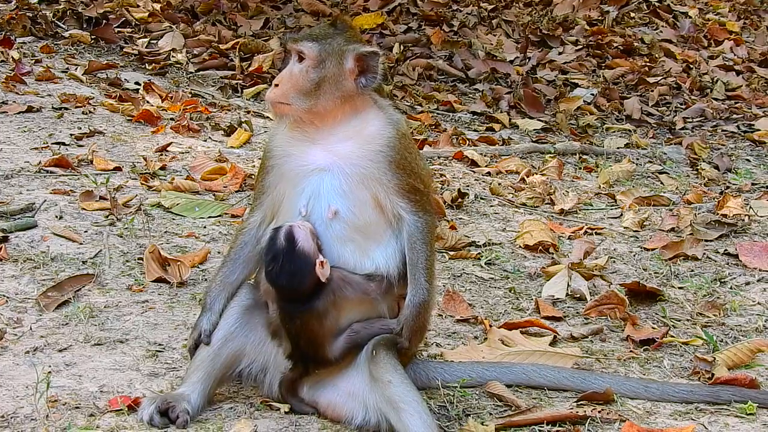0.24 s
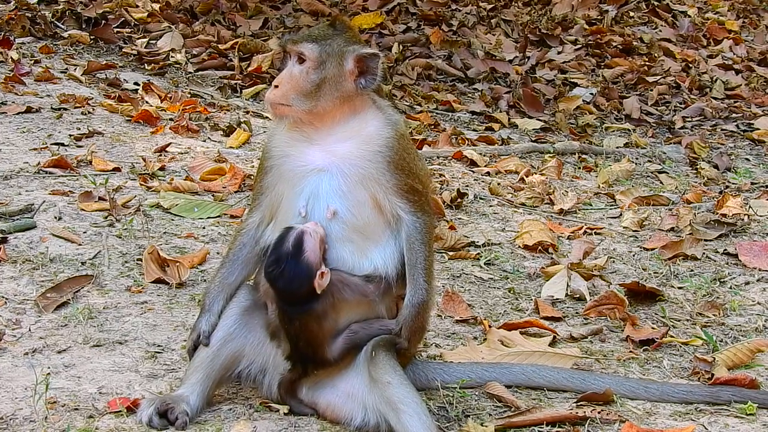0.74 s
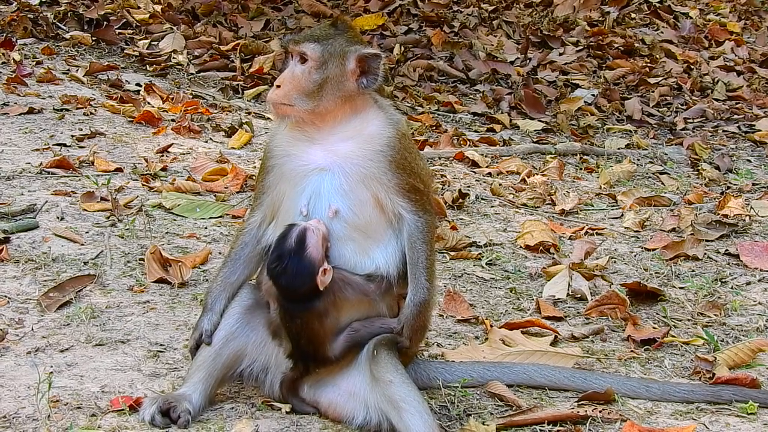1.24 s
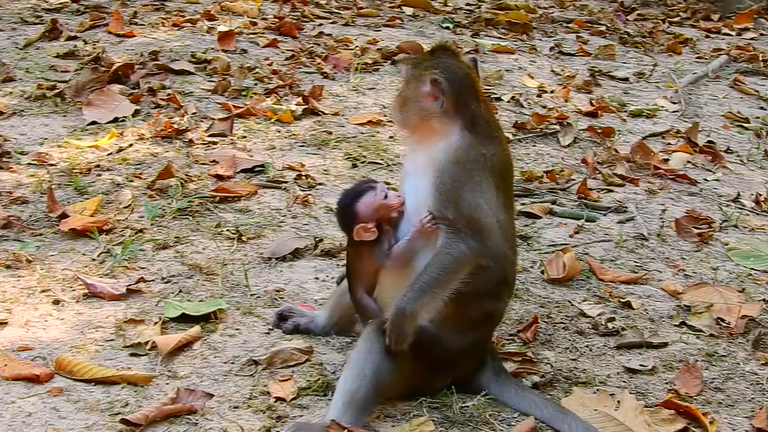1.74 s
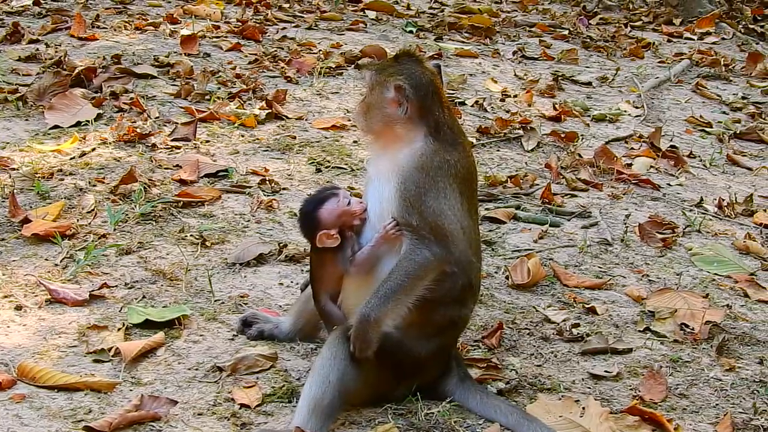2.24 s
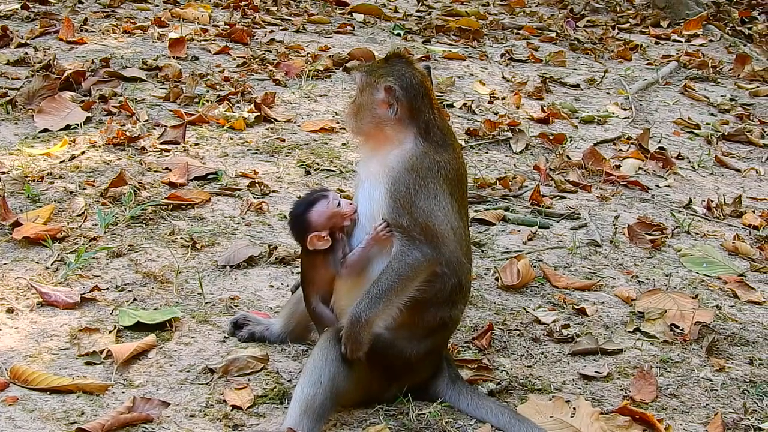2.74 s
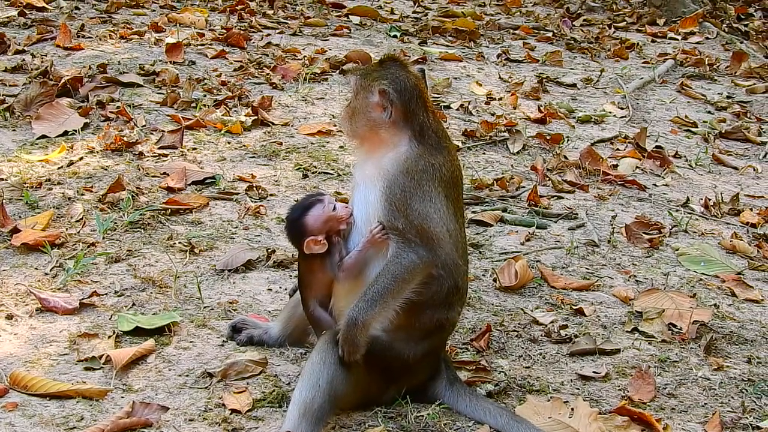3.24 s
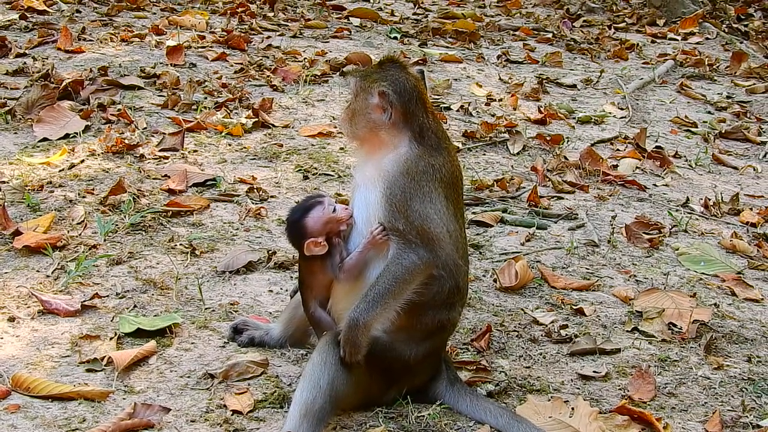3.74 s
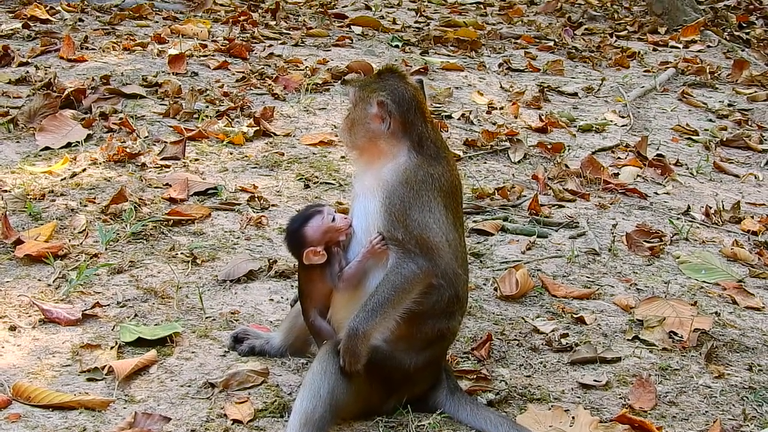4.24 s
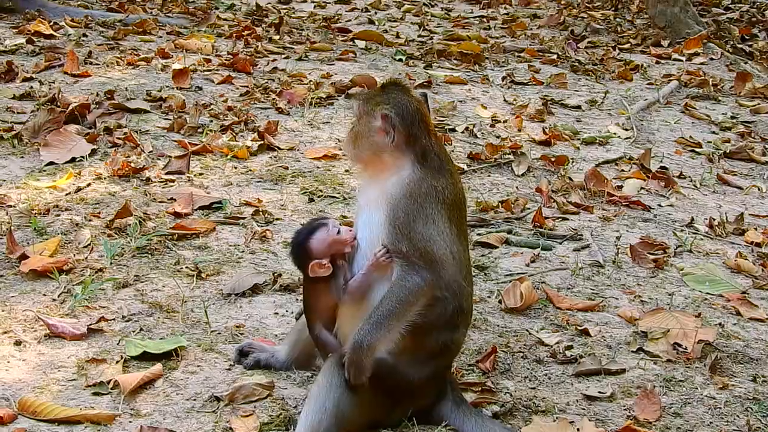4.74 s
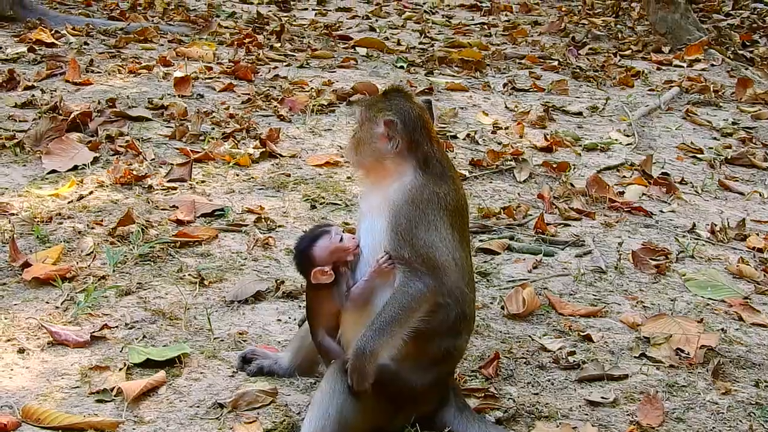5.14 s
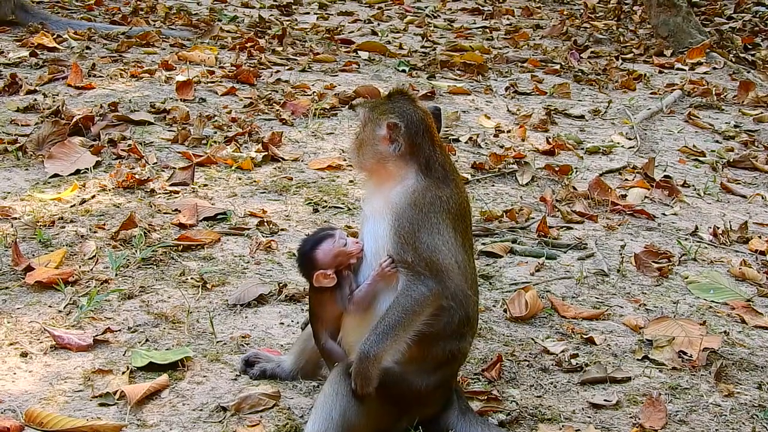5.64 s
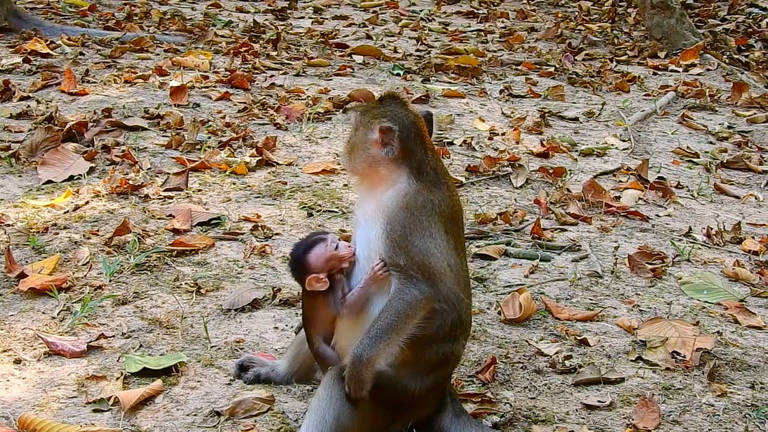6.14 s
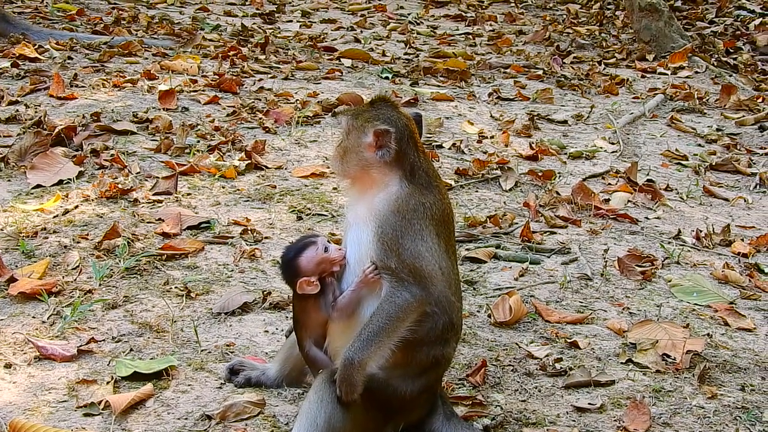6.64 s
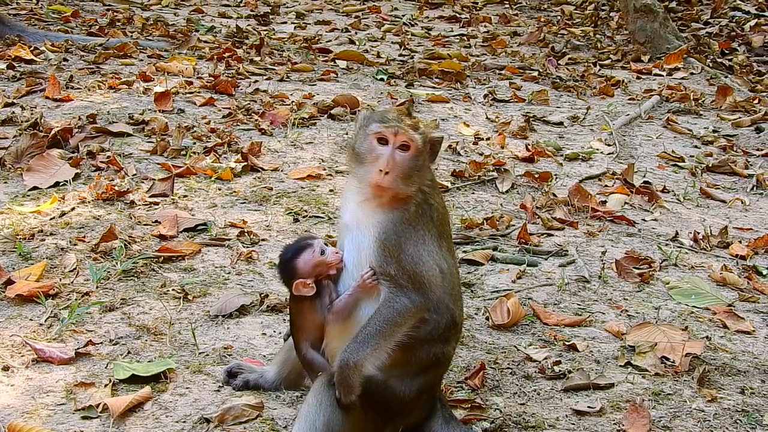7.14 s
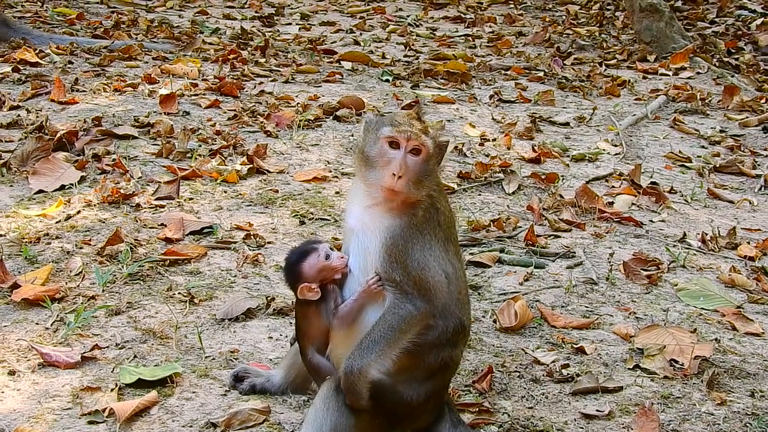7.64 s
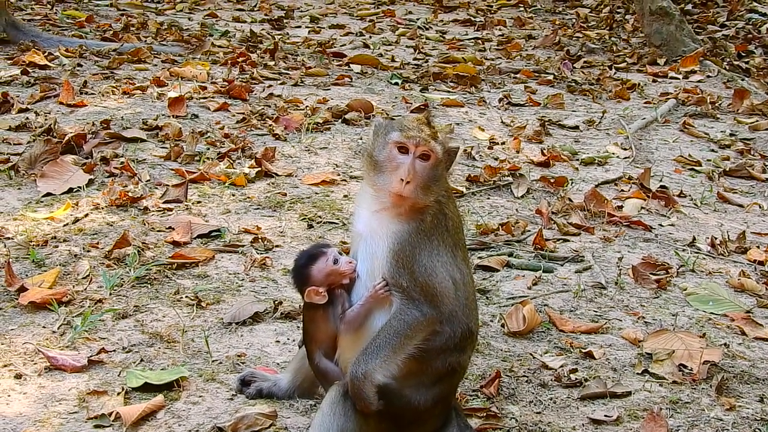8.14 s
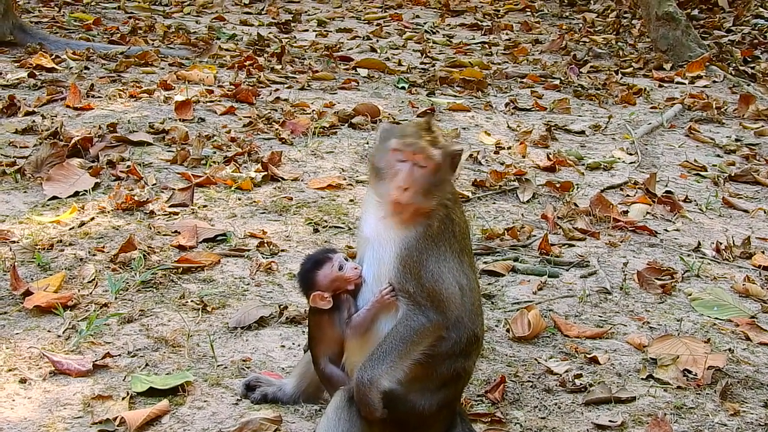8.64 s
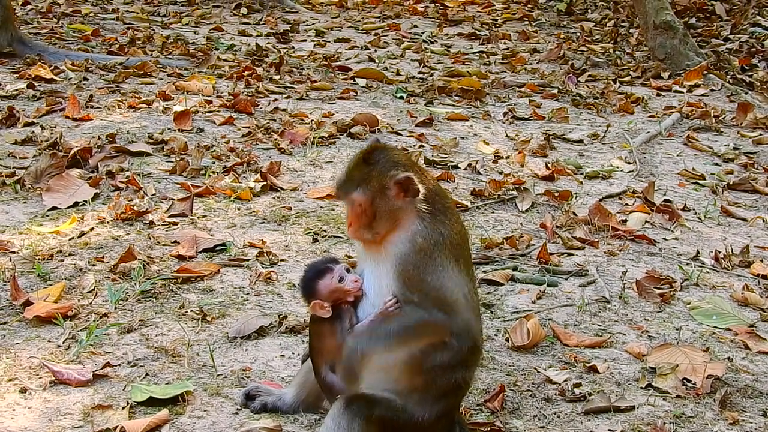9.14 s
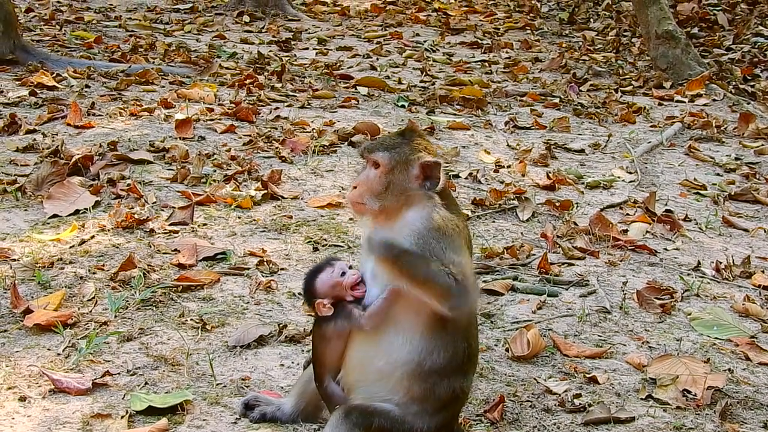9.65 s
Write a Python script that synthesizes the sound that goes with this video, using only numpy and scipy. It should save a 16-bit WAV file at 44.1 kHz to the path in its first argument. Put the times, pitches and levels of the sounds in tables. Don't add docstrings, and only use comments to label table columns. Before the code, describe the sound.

Young monkeys scream far off in echoing woods, then a nearby infant monkey coos in small chirps and ends on a piercing, breaking squeal.

```python
import sys
import numpy as np
from scipy import signal
from scipy.fft import rfft, irfft, next_fast_len
from scipy.io import wavfile
from scipy.ndimage import uniform_filter1d, map_coordinates

SR = 44100
rng = np.random.default_rng(int(sys.argv[2]) if len(sys.argv) > 2 else 0)


def magnitude_from_level(level_db):
    exponent = np.asarray(level_db, float) / 20
    return 10 ** exponent


def put_to_file(sound):
    columns = np.atleast_2d(sound).T
    safe = np.clip(columns, -1, 1)
    whole_steps = np.round(safe * 32767)
    wavfile.write(sys.argv[1], SR, whole_steps.astype(np.int16))


N = 435688

# [t/s, level/dB]
TRAFFIC = [(.8, -39.5), (1.85, -37.5), (2.34, -38.5), (3.3, -37), (4.85, -35), (5.68, -36), (6.43, -35),
           (9.5, -32)]
# [f/Hz, level/dB per Hz]
RUMBLE = [(27, -60), (42, -13), (54, -6), (70, -6), (96, 0.5), (129, 0), (189, -3.5), (205, -6), (258, -12),
          (355, -14), (398, -21.5), (500, -34.5), (650, -45), (1100, -120)]
MURMUR = [(260, -9), (450, -0.5), (649, -0.5), (717, -6), (1290, -6.5), (1550, -7.5), (4000, -12),
          (5200, -50), (8800, -120)]
INSECTS = [(2060, -17.5), (3500, -13), (4150, -5), (4990, -3.5), (5660, -3), (6550, 0), (7680, -11.5),
           (9500, -25), (12400, -56.5), (20900, -120)]
HISS = [(3000, -20), (7000, -10.5), (10000, 0), (15600, -9.5)]
# [f/Hz, coherence/1]
COHERENCE = [(40, 1), (200, 0.99), (400, 0.96), (900, 0.84), (2400, 0.79), (6000, 0.19), (15000, 0.2)]
# [t/s, f/Hz, level/dB]
WHINE = [(4.4, 4680, -69), (5, 4800, -62), (6.5, 5335, -60), (7.6, 5690, -57.5), (8.5, 5870, -60.5),
         (9.88, 6230, -57)]
FIRING_HZ = 23.67
MURMUR_DB, MURMUR_FOLLOWS, INSECT_DB, INSECT_FOLLOWS = -46.5, 0.63, -49, .15

# [t/s, pitch f/Hz, level/dB]
SCREAMS = [
    [(0, 733, -42), (.03, 805, -36), (.06, 839, -32), (.108, 829, -34), (.13, 854, -34), (.17, 858, -33.5),
     (.2, 827, -32.5), (.245, 841, -37)],
    [(.244, 725, -36), (.276, 802, -27.5), (.315, 868, -22), (.35, 867, -26), (.392, 892, -24.5),
     (.407, 930, -18.5), (.436, 909, -26.5), (.478, 874, -25), (.502, 788, -32.5)],
]
# [f/Hz, level/dB]
FIRST_THROAT = [(800, -13.5), (1700, -6.5), (2550, 2.5), (3400, 5.5), (4200, -17), (4600, 1.5), (5100, 6.5),
                (5900, -20.5), (6800, -0.5), (7700, -6.5), (8600, -26.5), (12000, -63.5)]
SECOND_THROAT = [(880, -26), (1800, -15.5), (2700, -9.5), (3400, -7.5), (3750, 3.5), (4500, -16.5),
                 (5400, -8.5), (6400, -4), (7300, -14), (8200, -20), (9500, -35), (13000, -58.5)]
# [f/Hz, level/dB per Hz]
BREATH = [(1500, -43), (2600, -5), (3700, -18.5), (4500, -3.5), (6400, -7), (8500, -13.5), (11000, -54.5)]
HOARSE, HOARSE_PER_DB, FULL_DB = .065, .004, -20
MOUTH_FOLLOWS, MOUTH_PITCH_HZ = 0.78, 904
# [f/Hz, t60/s]
REVERBERATION = [(500, 2.7), (2200, 0.78), (2450, 1.4), (2900, 1.2), (3720, 1.27), (4400, 1.3), (5500, 1.1),
                 (6500, 1.2), (10000, 0.6)]
# [start t/s, end t/s]
GAP = (1.039, 1.537)

# [t/s, level/dB, t60/s]
LEAF_TICKS = [(.872, -45.5, .11), (1.034, -39.5, .03), (1.76, -42, .04), (2.101, -45, .046),
              (3.603, -42, .03), (3.659, -45, .03), (4.818, -42, 0.053), (5.08, -50, .03),
              (5.807, -45.5, 0.085), (6.07, -47, .05), (6.163, -41.5, 0.05), (6.809, -41, 0.032),
              (6.908, -38, .036), (8.37, -47, 0.053), (8.598, -37, 0.031)]
# [centre f/Hz, width/Hz]
LEAF = (6140, 3720)
# [t/s, level/dB, centre f/Hz]
TWIG_SNAPS = [(0.862, -27.5, 1308), (1.027, -34, 750), (4.665, -39, 2010), (4.808, -39, 2320),
              (4.889, -43, 2500), (6.899, -39, 2600), (7.842, -36, 1150), (7.85, -37, 1900),
              (8.574, -39, 1980)]
TWIG_WIDTH, TWIG_T60 = 0.77, 0.036
# [t/s, level/dB, centre f/Hz, width/Hz, t60/s]
BUMPS = [(8.419, -37, 250, 114, 0.37), (8.48, -30.5, 184, 97, 0.24), (3.63, -60, 4300, 900, 1.2),
         (.495, -42.5, 3700, 900, 0.17), (.495, -35, 6000, 1600, 0.11), (9.81, -56, 12800, 900, .6),
         (9.865, -35.5, 6200, 2500, .2), (1.54, -58, 3720, 34, 1.5), (3.8, -58.5, 557, 30, 7.1),
         (9.84, -36, 4570, 500, 0.091), (9.55, -47.5, 5500, 3000, 0.25), (8.83, -58.5, 4250, 890, 1.7),
         (4.898, -44.5, 5600, 3000, 0.099), (1.54, -56.5, 740, 70, 0.84), (7.1, -53.5, 1660, 970, 0.71)]
# [t/s, peak level/dB, f/Hz, time to fall by 30 dB/s]
THUDS = [
    (3.061, -37.5, 644, 0.087),
    (6.326, -28.5, 353, 0.093),
]

# [level/dB, path of (t/s, f/Hz)]
WHISTLES = [
    (-76, [(2.465, 11370), (2.481, 11460), (2.51, 10860)]),
    (-73, [(2.56, 11100), (2.584, 11450), (2.636, 11560), (2.7, 10950), (2.734, 10470), (2.768, 10810), (2.83, 10430), (2.86, 9404)]),
    (-72, [(4.69, 10700), (4.704, 11240), (4.756, 11250), (4.774, 10980), (4.79, 9464)]),
    (-71, [(6.95, 11500), (6.988, 13380), (7.014, 13250), (7.06, 12350), (7.084, 10900), (7.135, 9765)]),
    (-70, [(8.895, 11200), (8.92, 12150), (8.99, 12780), (9.045, 12800), (9.065, 13400)]),
    (-78, [(9.06, 13300), (9.075, 13500), (9.11, 13600), (9.13, 14100), (9.15, 13200), (9.19, 11300), (9.23, 11000), (9.26, 9900)]),
]
FADE_DB = 9
# [t/s, f/Hz, level/dB]
BIRD = [(3.315, 2790, -60), (3.33, 2740, -52), (3.36, 2400, -39.5), (3.39, 2180, -40), (3.45, 2150, -46),
        (3.52, 2170, -42), (3.575, 2170, -44), (3.6, 2210, -71)]
# [start t/s, length/s, from f/Hz, to f/Hz, level/dB]
FAINT_BIRDS = [(3.278, 0.023, 6040, 5800, -46), (3.292, 0.037, 6250, 6550, -45),
               (3.655, 0.06, 2150, 2170, -46), (3.72, .06, 3770, 3850, -56), (3.86, .09, 2160, 2180, -50.5),
               (6.962, .05, 2330, 2260, -56), (7.04, .06, 2230, 2140, -52), (7.099, .15, 1930, 1900, -58)]

# [start t/s, length/s, top pitch f/Hz, level/dB, overtone level/dB]
CHIRPS = [
    (4.303, 0.054, 1206, -26, -27),
    (4.452, 0.073, 1367, -26.5, -21.5),
    (4.669, 0.077, 1456, -50, -26),
    (7.298, 0.066, 1287, -27.5, -22.5),
    (7.461, .066, 1202, -34.5, -17),
    (7.611, .062, 1284, -33, -22),
]
# [t/s, pitch f/Hz, level/dB]
LAST_CHIRP = [(7.804, 1470, -50), (7.808, 1454, -42), (7.822, 1498, -33.5), (7.838, 1532, -36),
              (7.852, 1512, -38.5), (7.866, 1460, -56)]
LAST_OPEN_DB, LAST_OPENS_S = -7, 7.819
# [share of length/1, pitch ratio/1, level/dB]
COO = [(0, .92, -25), (.13, .97, -4.5), (.26, 1.001, -1), (.5, .995, 0.1), (.7, .935, -3.5),
       (.87, 0.876, -8), (1, 0.92, -25)]
# [f/Hz, level/dB]
NEAR_THROAT = [(3300, -2), (3800, -1), (4600, 0), (6200, 2), (7700, -16), (9200, -22), (10800, -29),
               (12500, -36), (15500, -40)]
TURN_S = 6
# [second partial level/dB, late overtone swell/dB, overtones fading with effort/dB per dB]
BOUTS = [
    (-24, 7, 1.21),
    (-14, 8.5, .1),
]

# [t/s, f/Hz, level/dB]
SQUEAL = [
    [(9.542, 6880, -34), (9.551, 8130, -20.5), (9.561, 7820, -20.5), (9.571, 8060, -9.5),
     (9.588, 8490, -13.5), (9.6, 9080, -22), (9.615, 9170, -24), (9.63, 9000, -19), (9.638, 8850, -30)],
    [(9.637, 10200, -30), (9.641, 8910, -14), (9.65, 9250, -14.5), (9.675, 9280, -18), (9.69, 9150, -23.5),
     (9.706, 8830, -23.5), (9.725, 8400, -30.5)],
    [(9.745, 8540, -33.5), (9.755, 9360, -20), (9.769, 10260, -22.5), (9.808, 9030, -24),
     (9.858, 8560, -26), (9.868, 9240, -32), (9.885, 9720, -23)],
]
# [t/s, f/Hz, level/dB]
UNDERTONE = [
    [(9.674, 7060, -45), (9.68, 6980, -17.5), (9.688, 6950, -14.5), (9.698, 6890, -7.5),
     (9.703, 6700, -11.5), (9.711, 6500, -9)],
    [(9.708, 6550, -13.5), (9.718, 6290, -13), (9.723, 5920, -15.5), (9.728, 4960, -21.5)],
    [(9.726, 7270, -18), (9.733, 7000, -17.5), (9.742, 6670, -20), (9.753, 6220, -19)],
]
# [times whistle/1, times second/1, level under the second/dB, swell/dB]
SIDEBANDS = [
    (2, -1, -24, -5),
    (-1, 2, -19, 9.5),
]
# [t/s, level/dB]
RASP = [(9.59, -50), (9.635, -36), (9.68, -49.5), (9.703, -32.5), (9.708, -18), (9.728, -20), (9.75, -19),
        (9.758, -42.5), (9.85, -41)]
# [f/Hz, width/Hz, level/dB]
RASP_MOUTH = [(4800, 1700, 3.5), (6500, 1900, 4.5), (9000, 2600, -1.5), (12050, 2000, -10),
              (14560, 2500, -20)]
# [t/s, peak level/dB]
BREAKS = [(9.7068, -7.5), (9.7098, 0), (9.7143, -8), (9.7163, -7.5), (9.7183, -6.5), (9.7235, -2.5),
          (9.7255, -5), (9.7301, -11.5), (9.7312, -9.5), (9.732, -6.5), (9.7346, -7.5), (9.736, -8),
          (9.738, -2), (9.7418, -3.5), (9.7433, -5.5), (9.7483, -6), (9.7495, -6.5), (9.7518, -11.5)]
# [delay/s, level/dB, absorbed above f/Hz]
GROUND_ECHO = (.021, -15, 8500)


def noise(size):
    return np.random.default_rng(rng.integers(2 ** 31)).standard_normal(size)


def unit(x):
    return x / np.sqrt(np.mean(x ** 2) + 1e-20)


def along(points, hz):
    f, v = np.transpose(points)
    return np.interp(np.log(hz + 1), np.log(f + 1), v)


def span(rows):
    s, *cols = np.transpose(rows)
    start = int(s[0] * SR)
    t = np.arange(start, min(int(s[-1] * SR), N)) / SR
    edge = np.clip(np.minimum(t - s[0], s[-1] - t) / .002, 0, 1)
    return start, edge, [np.interp(t, s, c) for c in cols]


def wobble(rate, size=N):
    at = np.arange(0, size + 16, 16)
    knots = noise(int(size * rate / SR) + 4)
    curve = map_coordinates(knots, [at * rate / SR], mode="nearest")
    return np.interp(np.arange(size), at, curve)


def filtered(x, response):
    size = x.shape[-1]
    m = next_fast_len(size + 8192)
    return irfft(rfft(x, m) * response(np.fft.rfftfreq(m, 1 / SR)), m)[..., :size]


def modes(table):
    def response(f):
        return sum((-1) ** k * magnitude_from_level(db) * 1j * f * w / (c * c - f * f + 1j * f * w)
                   for k, (c, w, db) in enumerate(table))
    return response


def phase(hz):
    return 2 * np.pi * np.cumsum(hz) / SR


def tone(tables, orders=((1, 0),), jitter=.002, shimmer_db=2):
    out = np.zeros(N)
    for rows in tables:
        start, edge, (hz, db) = span(rows)
        n = len(hz)
        turn = phase(uniform_filter1d(hz, size=90) * (1 + jitter * wobble(300, size=n)))
        wave = sum(magnitude_from_level(gain_db) * np.sin(k * turn) for k, gain_db in orders)
        level = magnitude_from_level(db + shimmer_db * wobble(200, size=n))
        out[start:start + n] += np.sqrt(2) * edge * level * wave
    return out


def rush(spectrum, patchy_db):
    z = signal.stft(rng.standard_normal((2, N)), nperseg=512)[2]
    field = rng.standard_normal(z.shape[1:])
    field = uniform_filter1d(uniform_filter1d(field, 6, 0), 10, 1)
    pair = signal.istft(z * magnitude_from_level(patchy_db * unit(field)), nperseg=512)[1][:, :N]

    def response(hz):
        turn = np.arccos(np.clip(along(COHERENCE, hz), -1, 1 - 1 / 250)) / 2
        return magnitude_from_level(along(spectrum, hz)) * [np.cos(turn), np.sin(turn)]
    mid, side = filtered(pair, response)
    return unit(np.array([mid + side, mid - side]))


def engine():
    beat = np.cumsum(FIRING_HZ * (1 + 0.01202 * wobble(3))) / SR
    firings = (np.diff(np.floor(beat), prepend=0) > 0) * magnitude_from_level(2.99 * wobble(23))
    exhaust = modes([(49, 22, -5.0), (120, 71, -1), (186, 96, -0.5), (315, 200, -8)])
    return unit(filtered(firings, lambda f: exhaust(f) / (1 + 1j * f / 454.0) ** 4))


def background():
    rumble_db = np.interp(np.arange(N) / SR, *np.transpose(TRAFFIC))
    swell_db = rumble_db - rumble_db.mean()
    gust = wobble(6.8)
    murmur_db = MURMUR_DB + MURMUR_FOLLOWS * swell_db + 0.11 * gust
    insect_db = INSECT_DB + INSECT_FOLLOWS * swell_db + 0.24 * wobble(1.54) + 1.63 * gust + 0.16 * wobble(15)
    low = magnitude_from_level(rumble_db) * (rush(RUMBLE, patchy_db=0.5) + magnitude_from_level(-6.0) * engine())
    murmur = magnitude_from_level(murmur_db) * rush(MURMUR, patchy_db=1.37)
    insects = magnitude_from_level(insect_db) * rush(INSECTS, patchy_db=1.6)
    hiss = magnitude_from_level(-69.0) * magnitude_from_level([[.6], [-.6]]) * rush(HISS, patchy_db=-1.5)
    return low + murmur + insects + hiss + tone([WHINE], jitter=0.0132, shimmer_db=4.0)


def screams():
    out = np.zeros(N)
    for rows, throat, follows in zip(SCREAMS, (FIRST_THROAT, SECOND_THROAT), (0, MOUTH_FOLLOWS)):
        start, edge, (hz, db) = span(rows)
        n = len(hz)
        hoarse = np.clip(HOARSE + HOARSE_PER_DB * (FULL_DB - db), .03, .3)
        unsteady = 1 + .004 * wobble(120, size=n) + .006 * wobble(45, size=n)
        turn = phase(uniform_filter1d(hz, size=250) * unsteady)
        shifted_hz = hz * (MOUTH_PITCH_HZ / hz) ** follows
        wave = np.zeros(n)
        for k in range(1, 15):
            gain = magnitude_from_level(along(throat, k * (shifted_hz if k < 6 else hz)))
            flutter = magnitude_from_level(4 * wobble(70, size=n))
            scatter = 2.2 * hoarse * wobble(700, size=n)
            wave += gain * flutter * np.sin(k * turn + k * k + k / 5 * scatter)
        strength = np.sqrt(np.abs(uniform_filter1d(wave ** 2, size=2000)) + 1e-12)
        breath = 2 * hoarse * unit(filtered(noise(n), lambda f: magnitude_from_level(along(BREATH, f))))
        out[start:start + n] += edge * magnitude_from_level(db - 1.5) * (wave / strength + breath)
    return out


def trees(x, stretch):
    hz, t, z = signal.stft(noise((2, 3 * SR // 2)), SR, nperseg=256)
    decay = magnitude_from_level(-60 * t / (stretch * along(REVERBERATION, hz)[:, None]))
    tail = signal.istft(z * decay, SR, nperseg=256)[1]
    tail = tail[0] + 0.52 * np.array([tail[1], -tail[1]])
    first, last = np.flatnonzero(x)[[0, -1]]
    wet = signal.fftconvolve(x[None, first:last + 1], tail / np.linalg.norm(tail[0]), axes=1)
    return np.pad(wet, ((0, 0), (first + 600, N)))[:, :N]


def leaves():
    out = np.zeros((2, N + SR))
    ticks = [(s, db, *LEAF, t60) for s, db, t60 in LEAF_TICKS]
    snaps = [(s, db, hz, TWIG_WIDTH * hz, TWIG_T60) for s, db, hz in TWIG_SNAPS]
    for s, db, hz, width_hz, t60 in ticks + snaps + BUMPS:
        t = np.arange(int(SR * min(t60, .8))) / SR
        common, side = noise((2, len(t)))
        body = modes([(hz, width_hz, 0)])
        burst = filtered(common + 0.17 * side * [[1], [-1]], lambda f: (body(f) / (1 + 1j * f / 3200.0)) ** 2)
        start = round(s * SR)
        decay = magnitude_from_level(db + 9.5 - 60 * t / t60)
        out[:, start:start + len(t)] += unit(burst) * decay * (1 - np.exp(-t / 0.0064))
    t = np.arange(SR // 4) / SR
    for s, db, hz, t60 in THUDS:
        start = round(s * SR)
        swing = np.sin(2 * np.pi * hz * t) * (1 - np.exp(-t / 0.008))
        out[:, start:start + len(t)] += magnitude_from_level(db + 2.5 - 30 * t / t60) * swing
    return out[:, :N]


def whistles():
    glides = []
    for db, path in WHISTLES:
        ends = (path[0][0], path[-1][0])
        glides.append([(s, hz, db - FADE_DB * (s in ends)) for s, hz in path])
    return tone(glides, shimmer_db=2.5)


def far_birds():
    notes = []
    for s, length, a, b, db in FAINT_BIRDS:
        notes.append([(s + u * length, a + u * (b - a), db - 9 * (2 * u - 1) ** 2)
                      for u in np.linspace(0, 1, num=5)])
    return tone(notes, jitter=0.0069, shimmer_db=1.0)


def birds():
    call = tone([BIRD], jitter=.0008, shimmer_db=.8)
    onset = tone([BIRD[:4]], jitter=.001, shimmer_db=1.5)
    return call + magnitude_from_level(3.0) * trees(onset, stretch=1.1) + magnitude_from_level(-6) * trees(call, stretch=0.71) + far_birds()


def chirps():
    out = np.zeros(N)
    calls = []
    for s, length, top_hz, db, open_db in CHIRPS:
        rows = [(s + u * length, ratio * top_hz, db + shape_db) for u, ratio, shape_db in COO]
        calls.append((rows, open_db))
    for rows, open_db in calls + [(LAST_CHIRP, LAST_OPEN_DB)]:
        start, edge, (hz, db) = span(rows)
        n = len(hz)
        octave_db, late_db, fading = BOUTS[int(start > TURN_S * SR)]
        turn = phase(uniform_filter1d(hz, size=300))
        over = np.zeros(n)
        for k in range(3, 11):
            flutter = magnitude_from_level(4 * wobble(80, size=n))
            over += magnitude_from_level(along(NEAR_THROAT, k * hz)) * flutter * np.sin(k * turn + k * k)
        opening = magnitude_from_level(open_db + late_db * np.linspace(-1, 1, n) + fading * (db - db.max()))
        if rows is LAST_CHIRP:
            t = np.arange(start, start + n) / SR
            opening = opening * np.clip((t - LAST_OPENS_S) / .004, .1, 1)
        voice = np.sin(turn) + magnitude_from_level(octave_db) * np.sin(2 * turn) + opening * over
        out[start:start + n] += np.sqrt(2) * edge * magnitude_from_level(db) * voice
    return out


def combination_tones():
    second = UNDERTONE[0]
    whistle_t, whistle_f = np.transpose(SQUEAL[1])[:2]
    s0, s1 = second[0][0], second[-1][0]
    mixed = []
    for a, b, under_db, swell_db in SIDEBANDS:
        mixed.append([(s, a * np.interp(s, whistle_t, whistle_f) + b * hz,
                       db + under_db + swell_db * (2 * (s - s0) / (s1 - s0) - 1)) for s, hz, db in second])
    return mixed


def rasp_and_slaps():
    mouth = modes(RASP_MOUTH)

    def throat(x):
        return filtered(x, lambda f: mouth(f) ** 2 * f ** 6 / (f ** 6 + 4700.0 ** 6))

    def slap(x):
        return filtered(throat(x), modes([(6400, 3000, 0)]))
    start, edge, (db,) = span(RASP)
    n = len(db)
    slaps = np.zeros(n)
    for s, peak_db in BREAKS:
        slaps[round(s * SR) - start] = magnitude_from_level(peak_db + 2.0)
    one_slap = np.abs(slap(np.eye(1, 2048)[0])).max()
    out = np.zeros(N)
    out[start:start + n] = edge * magnitude_from_level(db) * unit(throat(noise(n))) + slap(slaps) / one_slap
    return out


def squeal():
    whistle = tone(SQUEAL, jitter=.002, shimmer_db=.8)
    second = tone(UNDERTONE[:1] + combination_tones(), jitter=.004, shimmer_db=1)
    breaking = tone(UNDERTONE[1:], jitter=.02, shimmer_db=3)
    return whistle + second + breaking + rasp_and_slaps()


def ground(x):
    delay_s, db, top_hz = GROUND_ECHO
    return filtered(x, lambda f: magnitude_from_level(db) * np.exp(-2j * np.pi * f * delay_s) / (1 + (f / top_hz) ** 20))


def lagged(x, samples, pan_db):
    side = np.array([[1], [-1]])
    return magnitude_from_level(pan_db / 2 * side) * filtered(x, lambda f: np.exp(1j * np.pi * f / SR * samples * side))


def scene():
    far = screams()
    echo = magnitude_from_level(-4.5) * trees(far, stretch=0.86)
    back, earlier = round(GAP[1] * SR), round(.9 * SR)
    echo[:, back:] = magnitude_from_level(-7.5) * echo[:, back - earlier:N - earlier]
    cry = squeal()
    cry = cry + ground(cry)
    infant = lagged(cry, samples=0.51, pan_db=-0.2) + magnitude_from_level(-19.0) * trees(cry, stretch=.55) + chirps() + whistles()
    return background() + far * magnitude_from_level([[.3], [-.3]]) + echo + leaves() + birds() + infant


def band_limit(x):
    return signal.sosfilt(signal.butter(12, 15730, fs=SR, output="sos"), x)


def record(dry):
    t = np.arange(N) / SR
    silent = (t > GAP[0]) & (t < GAP[1])
    smear = magnitude_from_level(-24 - 1200 * np.abs(t - GAP[0])) * (t < GAP[0] + .016)
    held = dry / (1 + np.abs(dry / .8) ** 4) ** (1 / 4)
    return band_limit(held * np.where(silent, smear, 1))


dry = scene()
out = record(dry)
put_to_file(out)
```